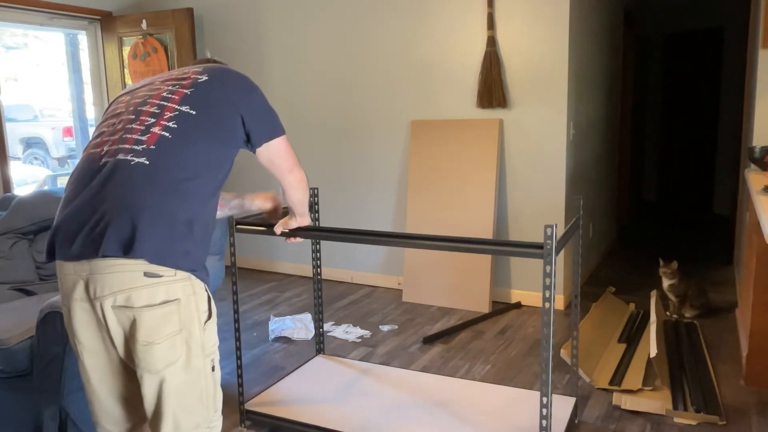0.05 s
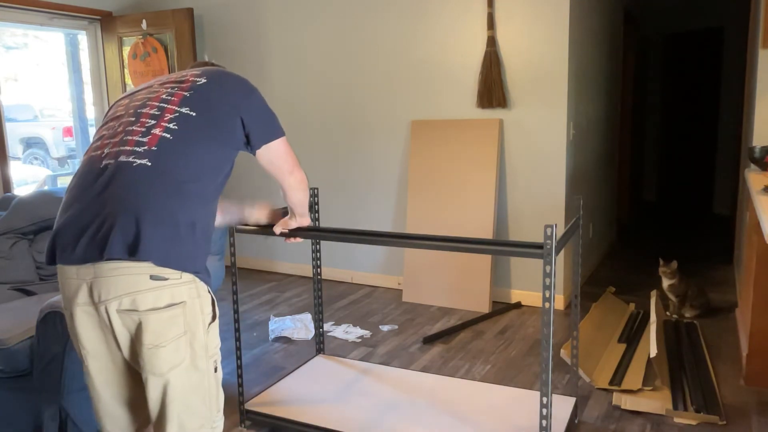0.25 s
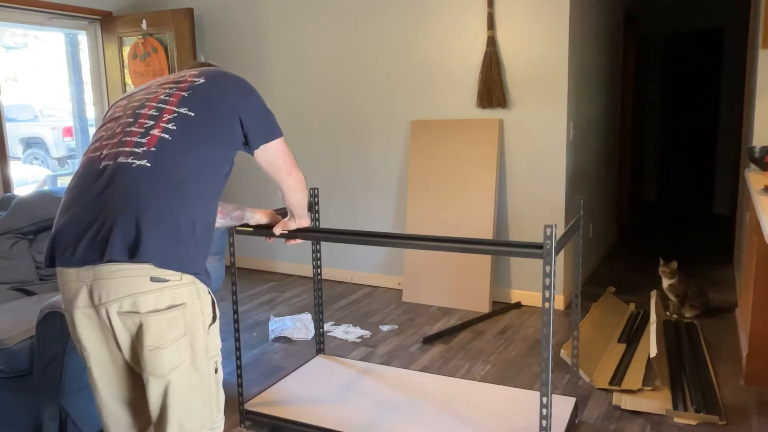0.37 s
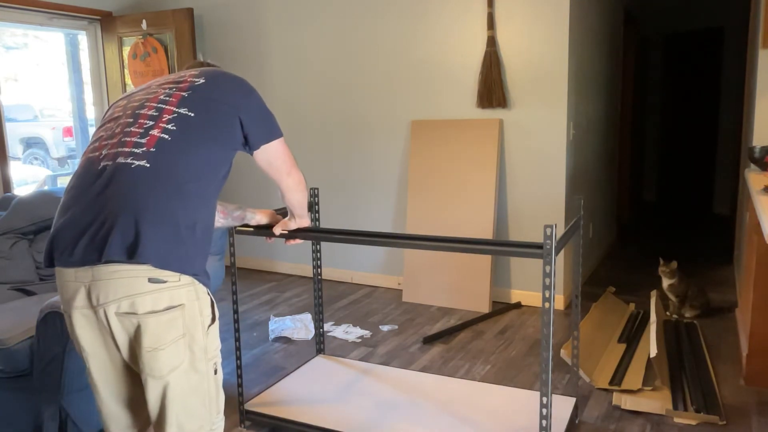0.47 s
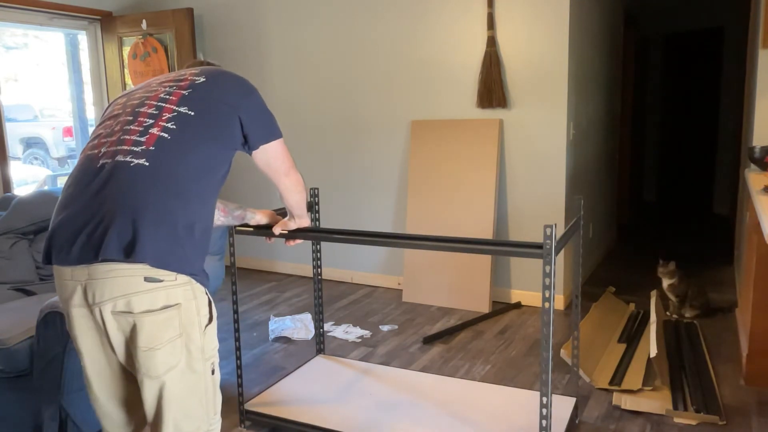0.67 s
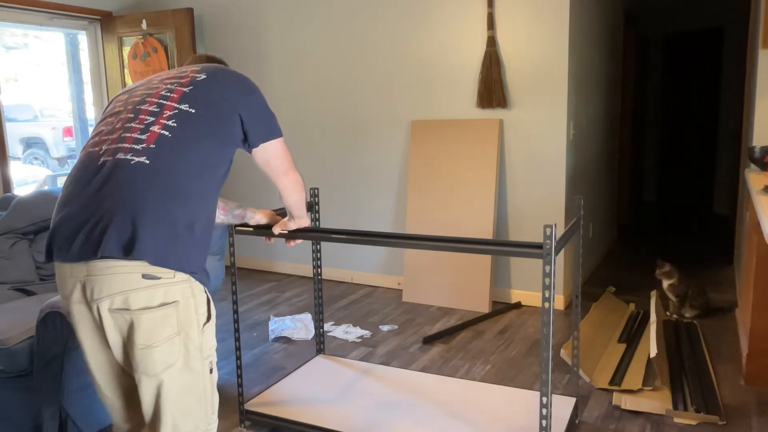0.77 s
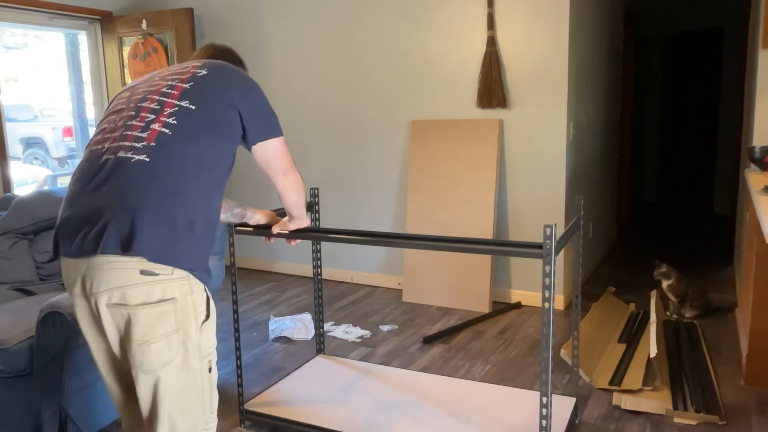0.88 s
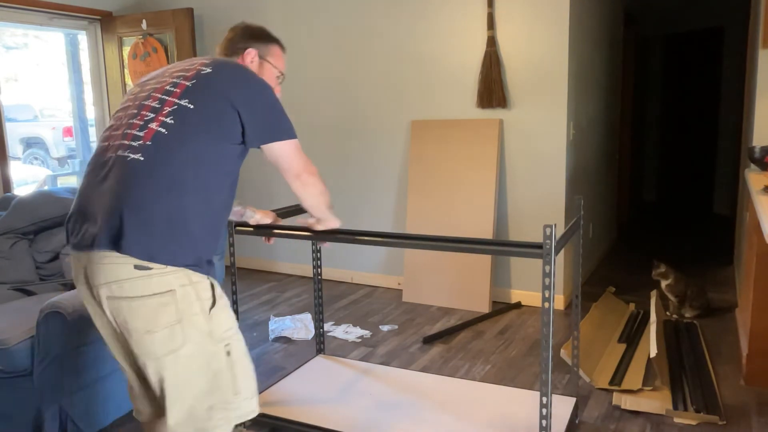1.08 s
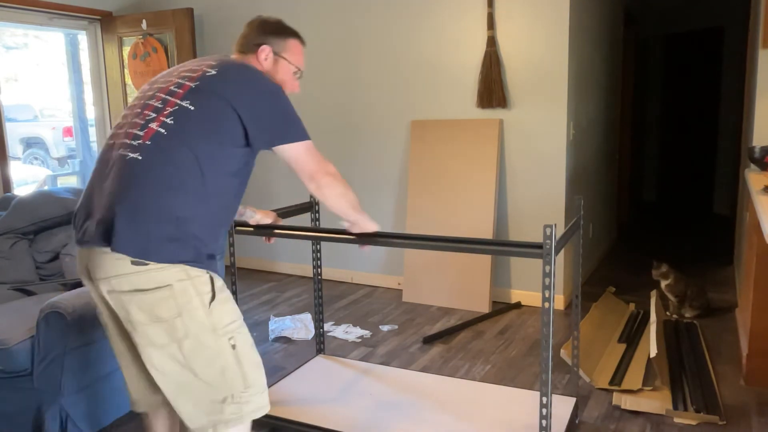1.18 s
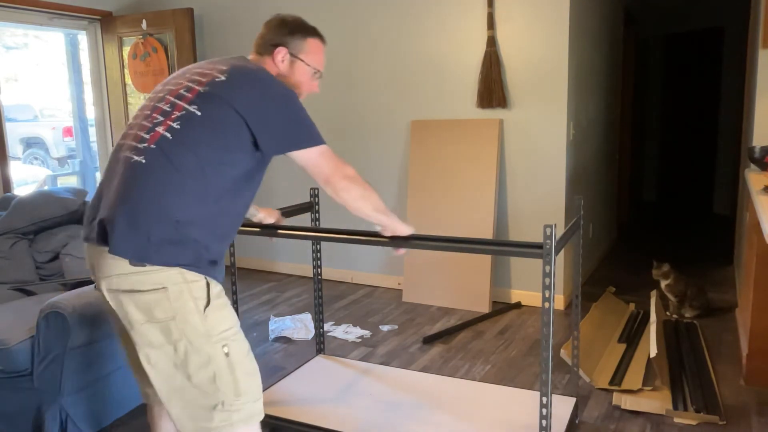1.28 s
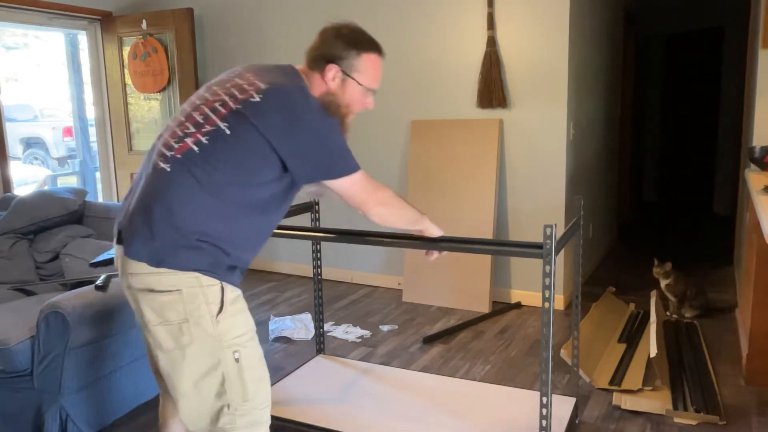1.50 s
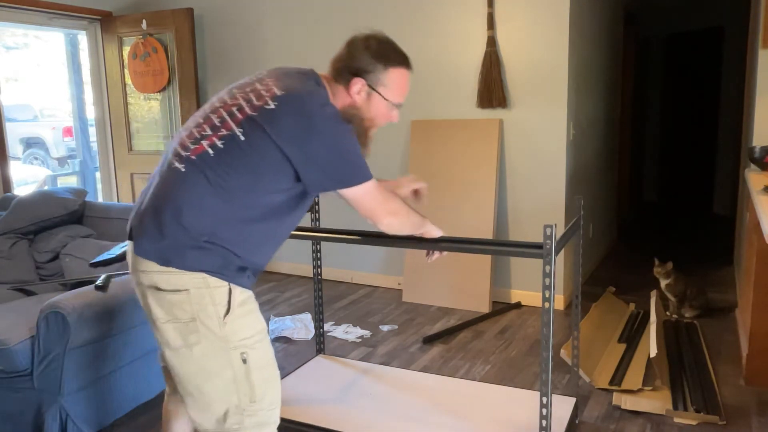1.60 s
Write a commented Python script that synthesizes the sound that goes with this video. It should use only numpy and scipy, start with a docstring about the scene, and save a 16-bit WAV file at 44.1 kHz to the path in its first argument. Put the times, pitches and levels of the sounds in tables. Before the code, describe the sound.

A steel shelf beam snaps into its frame with one loud, rattling bang. The frame rings and skids briefly as the floor booms. A faint hand rub and a soft footstep follow, heard from within a living room.

```python
"""A living room, stereo microphone in earshot of both the direct crack and the room's answer.
A steel shelving frame is shoved home: a beam snaps into its slots, slams down and rattles.
The frame rings and skids a little on its feet, and the board and floor boom under the landings.
Then a hand rubs and slides along the rail, and a foot comes down softly, over a low room tone."""
import sys
import numpy as np
from scipy import signal
from scipy.fft import rfft, irfft
from scipy.io import wavfile
from scipy.ndimage import uniform_filter1d

SR = 44100
rng = np.random.default_rng(int(sys.argv[2]) if len(sys.argv) > 2 else 0)


def put_to_file(sound):
    """Save the sound as 16-bit audio at rate SR, in the file named by the first command-line argument."""
    columns = np.atleast_2d(sound).T  # one column per channel
    safe = np.clip(columns, -1, 1)
    whole_steps = np.round(safe * 32767)
    wavfile.write(sys.argv[1], SR, whole_steps.astype(np.int16))


N = 72765
T, HZ = np.arange(N) / SR, np.fft.rfftfreq(N, 1 / SR)

# likeness of left and right at the microphone: f/Hz, correlation
CORRELATION = [(50, 1), (125, 0.88), (250, 0.82), (500, 0.3), (1000, 0.5), (2000, 0.2), (4000, -.15),
               (12000, -.2)]
# dying away of frame and room together: f/Hz, t60/s
DECAY = [(60, 0.73), (130, 1), (250, 0.48), (500, 0.61), (1000, 0.52), (2000, .5), (3700, 0.5),
         (5500, 0.43), (8000, 0.3), (11000, .33), (16000, .24)]
# colour of the room tone: f/Hz, level/dB
ROOM_COLOUR = [(20, -32), (38, -38.5), (57, -0.5), (85, -3.5), (120, -23.5), (150, -12), (200, -15),
               (245, -11.5), (300, -14), (360, -15.5), (500, -21), (1000, -32.5), (2000, -40),
               (4000, -58.5), (16000, -63.5)]
# contacts of the beam: t/s, snap level/dB, clang level/dB
BLOWS = [(.2360, -8, -27), (0.2376, -8, -21), (.2420, -9, -5.5), (0.2496, -12.5, -1), (.2520, -21, -2),
         (0.2626, -14, -5), (0.2751, -14.5, -11.5), (.2990, -20.5, -7.5), (.3310, -20, -8),
         (.3580, -25.5, -8.5), (.3950, -28, -13.5), (.4560, -26.5, -23.5), (0.477, -57, -22.5)]
# colour of the bright snap: f/Hz, level/dB
SNAP_COLOUR = [(100, -21), (600, -27), (1300, -3.5), (1800, 1), (2400, -8), (3100, 3), (4000, 0.5),
               (4800, -14), (8000, -22.5), (11000, -39), (16000, -51)]
# colour of the heavy clang: f/Hz, level/dB
CLANG_COLOUR = [(30, -41), (60, -11.5), (120, -3), (250, 1), (500, -4), (800, -3.5), (1500, -3.5),
                (2000, -10), (2700, -16.5), (3700, -8), (4800, -17), (7500, -28), (10500, -35.5),
                (15000, -50.5)]
# colour of the thin steel's sizzle: f/Hz, level/dB
SIZZLE_COLOUR = [(1000, -39), (3500, -8), (5500, 3), (8000, -1), (10500, 0), (12500, -16), (14800, -1.5)]
# modes of the steel frame: f/Hz, level/dB, t60/s, swell/s
FRAME_MODES = [(239, -5, 1.35, .15), (247, -7, 1.35, .15), (431, 5, .58, .08), (467, -1, .75, .01),
               (757, 0, .6, .005), (778, 0, .6, .01), (926, -3, .62, .005), (1008, -3, .55, .01),
               (1098, -3, .6, .01), (1349, -2, .46, .003), (1380, 2, .48, .003), (1470, -4, .46, .003),
               (1672, 0, .42, .003), (1764, -3, .42, .003), (2358, -8, .48, .003), (2636, -8, .46, .003),
               (3005, -4, .42, .003), (3067, -3, .4, .003), (3208, -5, .4, .003)]
# modes of board and floor: f/Hz, level/dB, t60/s
BOARD_MODES = [(58, -1, .42), (79, 1, .42), (96, -2, .16), (108, -3, .28), (121, -9, .45), (156, -1, .42),
               (207, -3, .5), (265, -5, .62), (319, -7, .6)]
# landings on the board: t/s, level/dB, treble cutoff/Hz
LANDINGS = [(.2620, -21, 393), (0.278, -14.5, 262), (0.512, -29.5, 110), (0.613, -34.5, 88),
            (0.784, -46, 297.7)]
# colour of the skidding feet: f/Hz, level/dB
SKID_COLOUR = [(40, -20), (90, -3), (150, -14.5), (245, 6), (360, -8), (450, 3), (590, -6.5), (750, -2.5),
               (1100, -9.5), (1600, -14.5), (2500, -24.5), (8000, -62)]
# strokes of the hand: peak t/s, rise/s, fall/s, level/dB, tilt/(dB per octave)
STROKES = [(.815, 0.024, 0.042, -44, 0.5), (.84, .075, 0.12, -54, -2.1), (1.12, .1, 0.12, -53.5, -1.25),
           (1.248, 0.13, 0.098, -51, -0.1), (1.48, 0.063, 0.053, -62, 1.5)]
# colour of the hand's friction: f/Hz, level/dB
RUB_COLOUR = [(200, -17), (900, -4.5), (1500, -1.5), (2100, -3), (2800, -5.5), (3700, 5), (4700, -4.5),
              (6000, -1.5), (8500, -4), (11000, -9), (12500, -22.5), (15000, -4.5)]
# resonances of the rubbed rail: f/Hz, width/Hz, level/dB
RAIL_RESONANCES = [(1480, 130, 2.5), (1770, 81, 2), (2177, 120, 5.5), (3570, 110, -2.5), (4010, 90, 3),
                   (5400, 83, 3), (6760, 260, 2.5)]
# colour of the sole's scuff: f/Hz, level/dB
SCUFF_COLOUR = [(40, -25), (150, -6), (300, -5), (600, -19), (1300, -15.5), (2500, -32), (8000, -53)]


def amp(db):
    """Decibels to gain."""
    return 10 ** (np.asarray(db) / 20)


def unit(x):
    """Scales to rms 1."""
    return x / np.sqrt(np.mean(x ** 2) + 1e-20)


def fade(t, t60):
    """Gain that falls 60 dB in t60 seconds."""
    return np.exp(-np.log(1000) * t / t60)


def read(points, hz):
    """Reads a table on a log-frequency axis."""
    f, value = np.transpose(points)
    return np.interp(np.log(hz + 1), np.log(f + 1), value)


def convolve(x, response):
    """Passes a sound through a response, channel by channel."""
    return signal.fftconvolve(np.atleast_2d(x), np.atleast_2d(response), axes=1)[:, :N]


def colour(x, points, size=4096):
    """Minimum-phase filter with the given spectrum."""
    log_gain = np.log(amp(read(points, abs(np.fft.fftfreq(size, 1 / SR)))))
    spectrum = np.exp(np.conj(signal.hilbert(log_gain)))
    return convolve(x, np.fft.ifft(spectrum).real)


def noise(db=0):
    """Stereo noise of a given spectrum, as alike in both channels as the room makes it."""
    a, b = rfft(rng.standard_normal((2, N)))
    likeness = read(CORRELATION, HZ)
    mid, side = a * np.sqrt((1 + likeness) / 2), b * np.sqrt((1 - likeness) / 2)
    return unit(irfft(np.array([mid + side, mid - side]) * amp(db), N))


def click(at_s, db):
    """One sharp contact."""
    return amp(db) * (np.arange(N) == round(at_s * SR))


def tail(build_s=0.002, bands=12, size=32768):
    """Dense ringing of frame and room, each band dying at its own speed; energy 1."""
    t, f = T[:size], np.fft.rfftfreq(size, 1 / SR)
    spectrum, centres = rfft(noise()[:, :size]), np.geomspace(60, 16000, bands)
    ring = sum(irfft(spectrum * read(np.c_[centres, band], f), size) * fade(t, read(DECAY, hz))
               for hz, band in zip(centres, np.eye(bands)))
    ring *= 1 - np.exp(-t / build_s)
    return np.pad(unit(ring), ((0, 0), (0, N - size))) / np.sqrt(size)


def room_tone(hum_hz=60):
    """Low rumble of the house with a faint mains hum."""
    rumble = amp(-52.5) * noise(read(ROOM_COLOUR, HZ))
    hum = amp(-50) * np.sin(2 * np.pi * (hum_hz * T + rng.random()))
    return rumble + hum


def snap_lead_in(swell_s=0.0035):
    """A faint, bright hiss swells for a few milliseconds just before the snap."""
    until_snap = BLOWS[0][0] - T
    swell = (until_snap > 0) * np.exp(-abs(until_snap) / swell_s)
    return amp(-36) * swell * noise(read(SNAP_COLOUR, HZ))


def contacts(column, direct_db, left_db=0, crack_s=0.0028, groups=3):
    """The beam's blows reach the microphone directly as a crack, and through frame and room."""
    out = np.zeros((2, N))
    direct_gain = amp(direct_db + left_db * np.array([[1], [-1]]))
    for k in range(groups):  # successive blows ring differently
        crack = direct_gain * unit(noise() * np.exp(-T / crack_s)) / np.sqrt(N)
        blows = sum(click(row[0], row[column]) for row in BLOWS[k::groups])
        out += convolve(blows, crack + tail())
    return out


def beam():
    """The rivets snap brightly, left of centre; then the beam clangs down and rattles."""
    snap = colour(contacts(column=1, direct_db=-1, left_db=5.5), SNAP_COLOUR)
    clang = colour(contacts(column=2, direct_db=-12), CLANG_COLOUR)
    return amp(23) * snap + amp(27) * clang


def steel_sizzle(at_s=0.242):
    """The slam sets the thin steel sizzling in the treble."""
    return colour(convolve(click(at_s, db=14), tail(build_s=0.0027)), SIZZLE_COLOUR)


def frame_ring(slam_s=0.249):
    """The frame's clearest modes ring on from the slam; the low ones take time to swell."""
    t, out = np.maximum(T - slam_s, 0), np.zeros((2, N))
    for hz, db, t60, swell_s in FRAME_MODES:
        stereo_phase = np.arccos(read(CORRELATION, hz)) * np.array([[.5], [-.5]])
        level = amp(db) * fade(t, t60) * (1 - np.exp(-t / swell_s))
        out += level * np.sin(2 * np.pi * (hz * t + rng.random()) + stereo_phase)
    return amp(-23) * out


def board_boom(rise_s=0.0018):
    """Board and floor boom under each landing; a soft landing wakes only the lowest modes."""
    out = np.zeros(N)
    for at_s, db, cutoff_hz in LANDINGS:
        t = np.maximum(T - at_s, 0)
        onset = amp(db) * (1 - np.exp(-t / rise_s))
        for hz, mode_db, t60 in BOARD_MODES:
            gain = amp(mode_db) / np.hypot(1, (hz / cutoff_hz) ** 2)
            out -= onset * gain * fade(t, t60) * np.sin(2 * np.pi * hz * t)
    return out


def frame_skid(start_s=0.345, end_s=0.505, weaken_db=6.5, count=16, groups=4):
    """The feet slip unevenly, weaker as they come to rest; each slip rings frame and room."""
    progress = (np.arange(count) + rng.random(count)) / count
    slips = [click(start_s + (end_s - start_s) * p, db=13 - weaken_db * p) for p in progress]
    ringing = sum(convolve(sum(slips[k::groups]), tail()) for k in range(groups))
    return colour(ringing, SKID_COLOUR)


def hand_rub(grain_db=1):
    """Fine-grained friction swells and fades with each stroke along the rail."""
    out = np.zeros((2, N))
    rail_db = sum(db / (1 + ((HZ - hz) / width) ** 2) for hz, width, db in RAIL_RESONANCES)
    rub_db = read(RUB_COLOUR, HZ) + rail_db
    for peak_s, rise_s, fall_s, db, tilt_db in STROKES:
        from_peak = 2 * (T - peak_s) / np.where(T < peak_s, rise_s, fall_s)
        speed = 1 / np.cosh(np.clip(from_peak, -20, 20)) ** 0.55
        grain = amp(grain_db * unit(uniform_filter1d(rng.standard_normal(N), size=60)))
        friction = noise(rub_db + tilt_db * np.log2(HZ + 1))
        out += amp(db) * speed * unit(grain * friction)
    return out


def footfall(start_s=1.3635, length_s=0.11, floor_hz=53, scuff_s=0.067):
    """The floor flexes at its lowest mode while the sole scuffs."""
    t = T - start_s
    weight = np.sqrt(abs(np.sin(np.pi * np.clip(t / length_s, 0, 1))))
    flex = weight * np.sin(2 * np.pi * floor_hz * t)
    scuff = np.exp(-abs(t - length_s / 2) / scuff_s) * noise(read(SCUFF_COLOUR, HZ))
    return amp(-53.5) * scuff - amp(-36) * flex


def scene():
    """At the microphone: the bang and skid, the small movements after them and the room tone."""
    bang = snap_lead_in() + beam() + steel_sizzle() + frame_ring() + board_boom()
    return bang + frame_skid() + hand_rub() + footfall() + room_tone()


def record(dry):
    """The microphone drops the deepest bass, rounds off peaks and loses the top of the treble."""
    low_cut_hz, high_cut_hz = 20, 15800
    f = np.fft.rfftfreq(2 * N, 1 / SR)
    low_cut = 1 - 1 / (1 + (f / low_cut_hz) ** 4)
    rounded = np.tanh(irfft(rfft(dry, 2 * N) * low_cut)[:, :N])
    high_cut = signal.firwin(511, high_cut_hz, window=("kaiser", 9), fs=SR)
    return signal.oaconvolve(rounded, high_cut[None], "same")


dry = scene()
out = record(dry)
put_to_file(out)
```